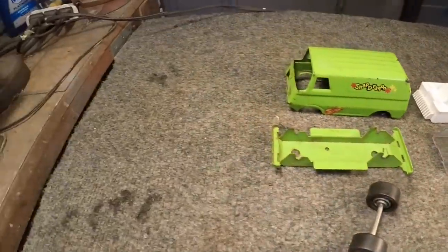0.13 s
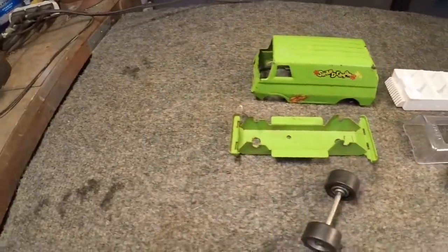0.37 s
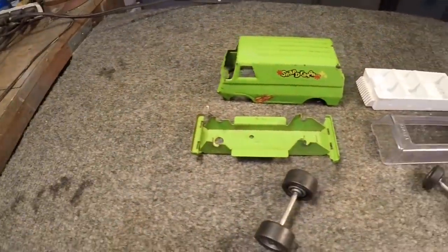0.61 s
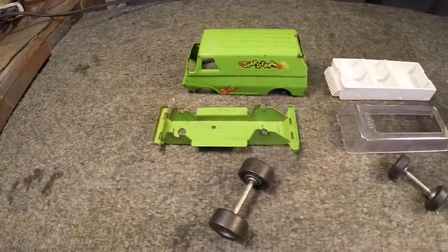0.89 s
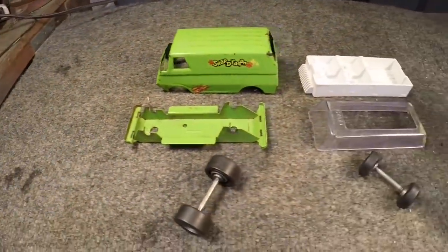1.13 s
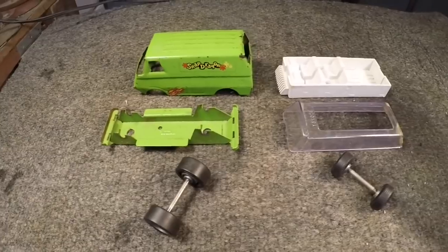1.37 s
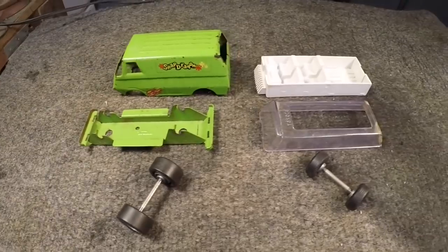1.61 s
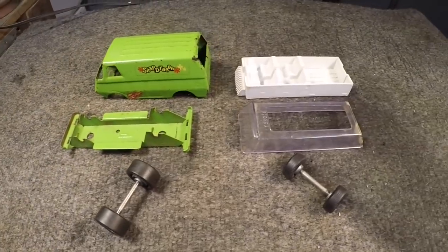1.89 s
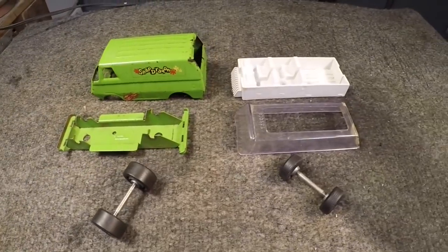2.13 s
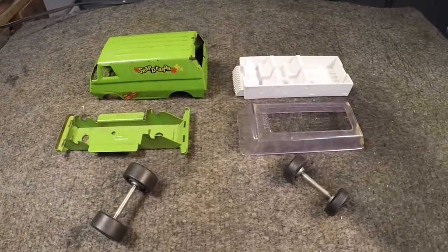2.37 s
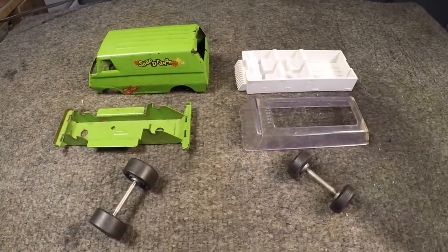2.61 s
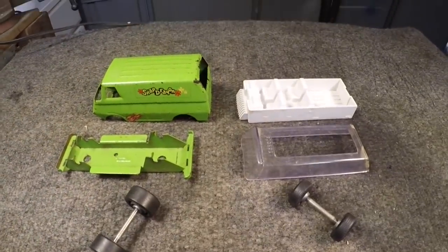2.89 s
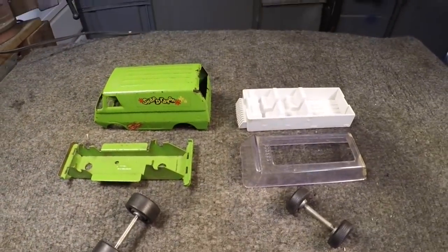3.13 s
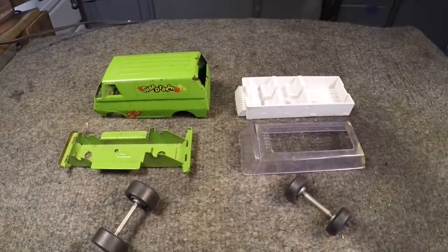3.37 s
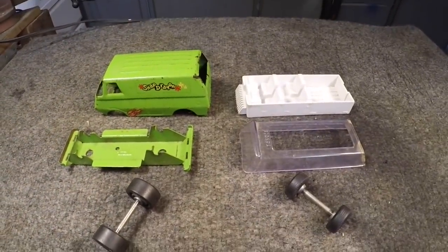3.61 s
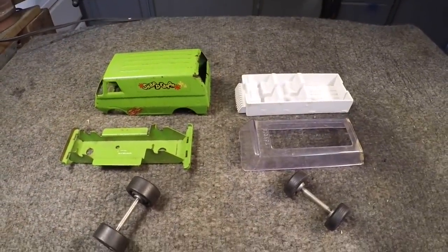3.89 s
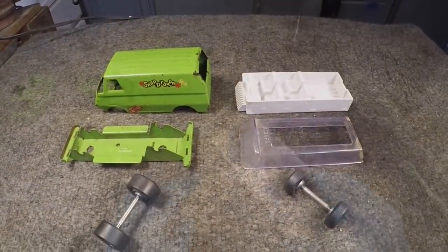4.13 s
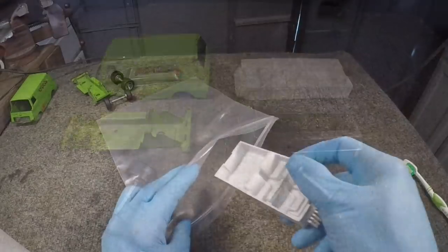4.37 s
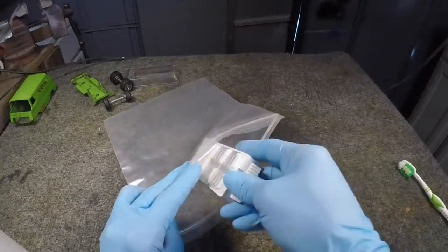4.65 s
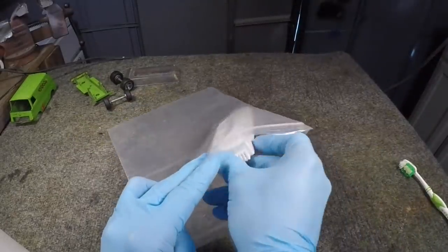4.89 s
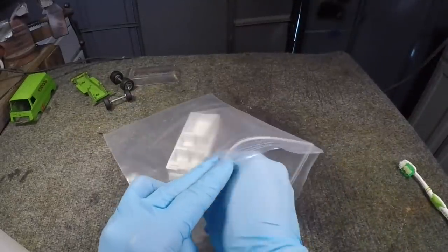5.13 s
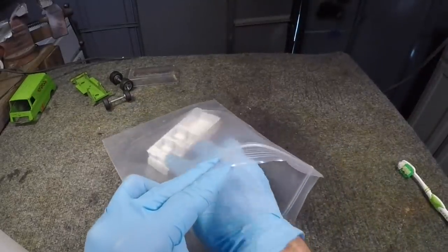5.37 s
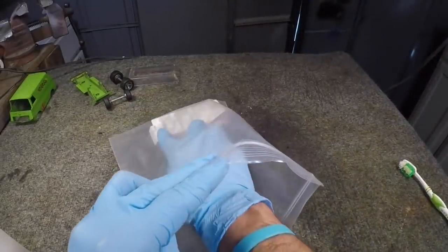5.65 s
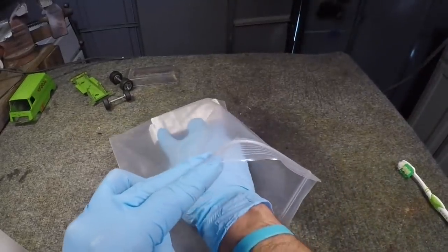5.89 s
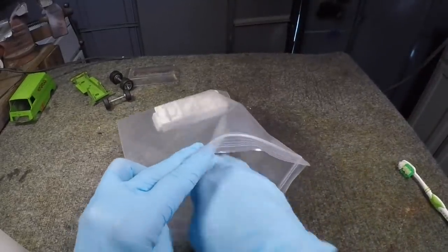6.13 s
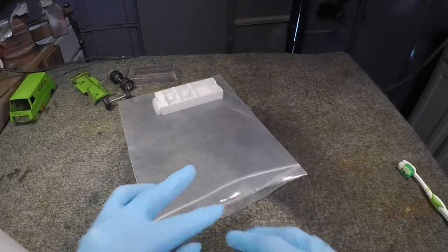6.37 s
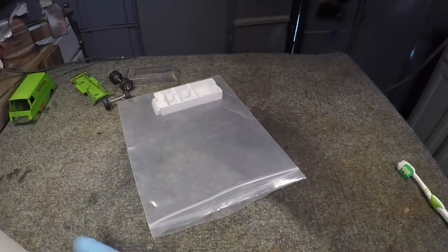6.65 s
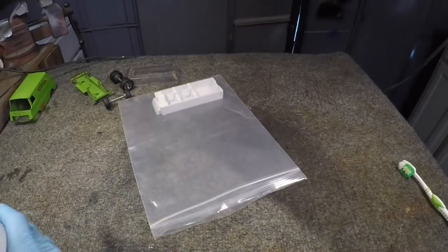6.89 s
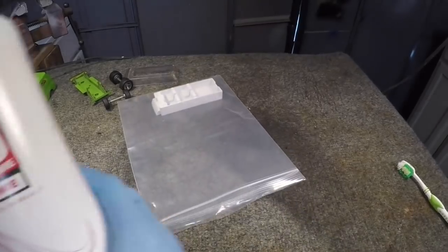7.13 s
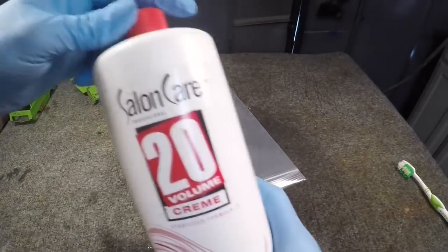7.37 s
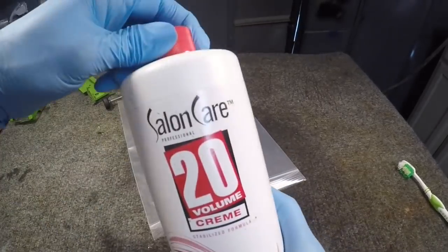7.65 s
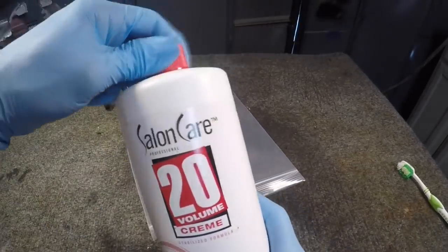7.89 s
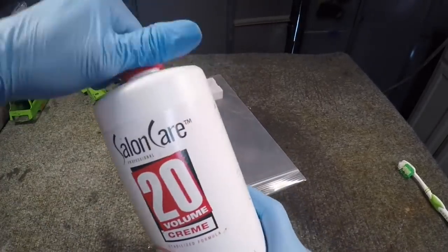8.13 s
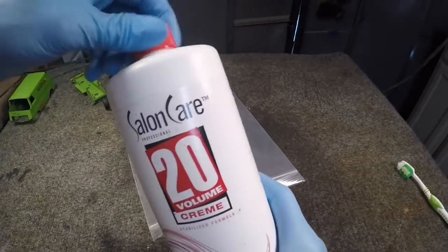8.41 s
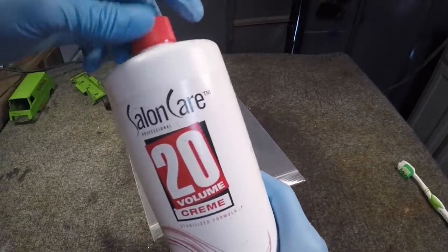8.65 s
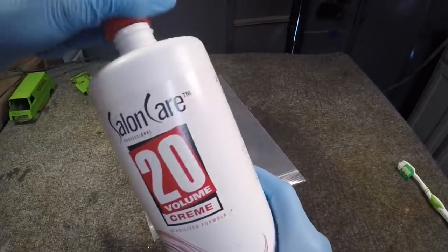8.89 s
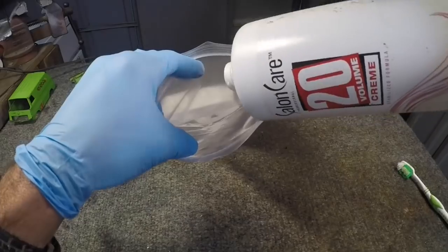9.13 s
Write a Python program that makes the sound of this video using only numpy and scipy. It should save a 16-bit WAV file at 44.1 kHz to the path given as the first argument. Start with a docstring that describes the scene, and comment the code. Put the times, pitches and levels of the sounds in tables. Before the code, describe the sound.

From 0 s a quiet, narrow room noise quickly swells into wide, low roar, with deep irregular air thumps and fluttering buffets at the microphone and weak, wavering fan tones. Buffeting stays strong until about 4.1 s, then sinks; a tiny tick at 4.4 s marks the change. A second background rises from near-mono to stereo by about 5 s: steady low fan hum, its tone swelling and sinking, plus roar and bright airy hiss. Close gloved hands give light, dry plastic taps and film crinkles from 4.9 to 5.6 s, sparse clicks near 5.9 s, then a busy cluster at 6.0-6.25 s. Faint rustles follow. At 7.04 s a bottle is softly knocked; at 7.93-8.1 s come knocks and a short, rough cap scrape with hiss. Duller, hollow knocks come at 8.66 s and 8.86-8.93 s, with a small tick at 9 s, and the fan continues to the end.

```python
"""Bagging a plastic part beside a fan

Two crossfaded scenes in a workshop, heard by a small two-port camera; each opens quiet and mono, then swells to stereo.
First low noise thumps and flutters at the ports, over room roar and fan tones. Then sines hum as the fan, while gloved
hands slide a part into a zip bag, lift a bottle and twist its ribbed cap: struck modes, noise snaps, grainy noise.
"""
import sys
import numpy as np
from scipy import signal
from scipy.fft import rfft, irfft, next_fast_len
from scipy.io import wavfile
from scipy.ndimage import map_coordinates

SR = 44100
rng = np.random.default_rng(int(sys.argv[2]) if len(sys.argv) > 2 else 0)


def materialize(psi):
    """Save the field psi as 16-bit PCM at rate SR to the path in sys.argv[1].

    A 1-D psi becomes a single channel; in a 2-D psi each row is a channel.
    """
    bounded = np.clip(np.atleast_2d(psi).T, -1, 1)
    quanta = np.round(bounded * 32767).astype(np.int16)
    wavfile.write(sys.argv[1], SR, quanta)


def boost_factor(decibels):
    """Convert a level in decibels to a linear amplitude factor."""
    exponent = np.asarray(decibels, float) / 20
    return 10 ** exponent


N = 408807


def seconds():
    """Time of every sample."""
    return np.arange(N) / SR


def unit(x):
    """Scaled to rms 1."""
    return x / np.sqrt(np.mean(x ** 2) + 1e-20)


def along(points, hz):
    """Columns of a (Hz, ..) table read on a log axis."""
    f, *cols = np.transpose(points)
    return [np.interp(np.log(hz + 1), np.log(f + 1), c) for c in cols]


def curves(rows):
    """One value per sample for each column after the time."""
    s, *cols = np.transpose(rows)
    return [np.interp(seconds(), s, c) for c in cols]


def wobble(rate_hz):
    """Smooth random curve, rate_hz knots a second."""
    at = np.arange(0, N + 8, 8)
    knots = rng.standard_normal(int(N * rate_hz / SR) + 4)
    return np.interp(np.arange(N), at, map_coordinates(knots, [at * rate_hz / SR]))


def filtered(x, response):
    """x times a complex response of frequency."""
    m = next_fast_len(x.shape[-1] + 8192)
    return irfft(rfft(x, m) * response(np.fft.rfftfreq(m, 1 / SR)), m)[..., :x.shape[-1]]


def band(x, lo_hz, hi_hz):
    """Causal band-pass."""
    return signal.sosfilt(signal.butter(3, [lo_hz, hi_hz], "bandpass", fs=SR, output="sos"), x)


def rush(spectrum):
    """Two unrelated noises of one colour, scaled together to rms 1."""
    hz = np.fft.rfftfreq(next_fast_len(N), 1 / SR)
    real, imag = rng.standard_normal((2, 2, len(hz)))
    return unit(irfft((real + 1j * imag) * boost_factor(along(spectrum, hz)[0]))[:, :N])


def swell(start_s, tau_s, full_db, depth_db, bend):
    """Level rising by depth_db to full_db; bend below 1 sets off steeply, above 1 eases in."""
    elapsed_s = np.clip(seconds() - start_s, 0, None)
    return full_db - depth_db * np.exp(-(elapsed_s / tau_s) ** bend)


def ports(heard, other, table, open_s, open_tau_s):
    """Left and right: the side signal is partly tied to the mid, partly unrelated, and grows in from open_s."""
    def tied(hz):
        db, in_phase, quarter = along(table, hz)
        link = np.clip(in_phase, -.95, .95) + 1j * np.clip(quarter, -.7, .7)
        unrelated = np.sqrt(np.clip(1 - abs(link) ** 2, 0, 1))
        return boost_factor(db) * np.array([link, unrelated])
    side = filtered(np.array([heard, other]), tied).sum(0)
    side = side * (1 - np.exp(-np.clip(seconds() - open_s, 0, None) / open_tau_s))
    return np.array([heard + side, heard - side])


# Each row: time in seconds, step in amplitude.
TICKS = [(4.42823, .1), (8.99945, -.07)]


def ticks():
    """A step in the waveform relaxes within milliseconds; the first falls at the end of the first scene."""
    out, t = np.zeros(N), np.arange(SR // 40) / SR
    for s, step in TICKS:
        out[round(s * SR):][:len(t)] += step * np.exp(-t / 0.0033)
    return out


# Noise spectra of the room. Each row: frequency in Hz, relative density in dB per Hz.
FIRST_ROAR = [(50, -38), (85, -7), (125, -1), (170, -5), (188, -11), (228, -7.5), (247, -2.5), (260, -9.5),
              (274, -5.5), (287, -10), (300, -5), (345, -5), (365, -8), (400, -4.5), (425, -13.5),
              (541, -13.5), (722, -20), (914, -16.5), (1000, -19), (1520, -23), (2100, -29), (3960, -38),
              (5000, -41), (6400, -36), (7590, -41), (9500, -45.5), (13500, -64), (15100, -79)]
FIRST_TREBLE = [(5000, -60), (6600, -7), (7500, 3), (8300, -6), (9500, -7.5), (11500, -24), (13500, -26),
                (15100, -34)]


def first_room(roar_db, treble_db):
    """Room roar as coloured noise, with a separate treble band."""
    return boost_factor(roar_db) * rush(FIRST_ROAR) + boost_factor(treble_db) * rush(FIRST_TREBLE)


BLADE_HZ = 82.75
# Third fan tone of the first scene. Each row: time in seconds, rms level in dB.
THIRD_TONE_DB = [(0.0, -56.5), (0.67, -46.5), (0.88, -63), (0.92, -51), (1.54, -39.5), (1.68, -68),
                 (1.83, -38.5), (2.28, -42.5), (2.6, -33.5), (2.66, -52), (2.8, -32.5), (3.07, -42.5),
                 (4.36, -46), (4.45, -60)]


def first_fan(roar_db):
    """Three fan hum sines at 2, 2.985 and 3.29 times the blade rate; the first two waver in phase."""
    turn = 2 * np.pi * BLADE_HZ * seconds()
    tones = boost_factor(roar_db - 12.5) * np.sin(3.29 * turn)
    tones += boost_factor(roar_db - 10.0 + 3.7 * wobble(3.85)) * np.sin(2 * turn + wobble(2.47))
    third = boost_factor(curves(THIRD_TONE_DB)[0]) * np.sin(2.985 * turn + .8 * wobble(2.5))
    return tones + np.sqrt(2) * third


# Draught at the ports. Each row: time in seconds, rms level in dB.
THUMP_DB = [(0, -25.5), (.12, -24.5), (.3, -23.5), (.37, -19), (.9, -20), (1.3, -20), (2.0, -17),
            (2.3, -15), (3.5, -15.5), (3.85, -19), (4.07, -12), (4.25, -24), (4.36, -19.5), (4.39, -36)]
# Spectra of thump and flutter. Each row: frequency in Hz, relative density in dB per Hz.
THUMP_SPECTRUM = [(11, -30), (18, -0.5), (32, -1), (52, -4.5), (75, -23), (120, -68), (200, -120)]
FLUTTER_SPECTRUM = [(30, -66), (52, -5.5), (65, -0.5), (100, -7), (135, -14), (160, -21), (205, -26),
                    (270, -38), (460, -120)]


def draught(flutter_db):
    """Eddies buffet the ports: deep noise thumps, and higher noise flutters in uneven bursts."""
    thumps = boost_factor(curves(THUMP_DB)[0]) * rush(THUMP_SPECTRUM)
    gusts_db = 1.1 * wobble(4.93)
    return thumps + boost_factor(flutter_db + gusts_db) * rush(FLUTTER_SPECTRUM)


# Ports in the first scene. Each row: frequency in Hz, side over mid in dB, in-phase link, quarter-cycle link.
FIRST_PORTS = [(28, -7.5, -0.22, 0.11), (52, -4.5, -0.46, 0.1), (96, 0, -0.81, 0.0081),
               (167, -3.5, -0.65, 0.09), (236, -12, 0.42, -0.09), (334, -13.5, 0.62, -0.22),
               (475, -8.5, -0.037, -0.04), (812, -1, -0.15, 0.01), (1555, -0.2, 0.068, 0.23),
               (2774, -1.5, 0.004, 0.05), (4387, -4, -0.06, -0.02), (6070, 1.5, 0.29, 0.02),
               (8500, -9, -0.94, -0.01), (12000, 2, -0.41, 0.0), (13416, -24, 0.0, -0.0)]


def first_scene():
    """Draught over room and fan; roar, treble and flutter sink before the end."""
    sinking_s = np.clip(seconds() - 4.15, 0, 1)
    roar_fall_db, flutter_fall_db = 41 * sinking_s, 30 * sinking_s
    roar_db = swell(start_s=0.63, tau_s=0.52, full_db=-31, depth_db=11, bend=0.5) - roar_fall_db
    treble_db = swell(start_s=0.5, tau_s=3, full_db=-55.5, depth_db=7, bend=1.5) - roar_fall_db
    flutter_db = swell(start_s=0.22, tau_s=0.06, full_db=-24, depth_db=19.5, bend=0.3) - flutter_fall_db
    pair = first_room(roar_db, treble_db) + draught(flutter_db)
    pair[0] += first_fan(roar_db)
    closing = np.clip((TICKS[0][0] - seconds()) / .004, 0, 1)
    return ports(*pair, FIRST_PORTS, open_s=0.1, open_tau_s=0.17) * closing


# Noise spectra of the room. Each row: frequency in Hz, relative density in dB per Hz.
SECOND_ROAR = [(60, -35), (85, 3.5), (103, -9), (150, 1), (200, -6), (225, -3), (245, 7), (262, -2),
               (285, -3), (340, 0.5), (395, -0.5), (445, -14.5), (550, -7), (690, -15.5), (910, -13),
               (1300, -18.5), (2500, -26.5), (4000, -120)]
SECOND_AIR = [(760, -39), (1300, 2.5), (1940, 3), (2400, -7), (2900, 0.5), (3500, -4.5), (4350, -9),
              (5100, -22), (6500, -14.5), (8000, -20), (8900, -18.5), (10500, -28), (13400, -45),
              (15100, -70)]
SECOND_RUMBLE = [(12, -32), (20, -10), (30, 3), (44, -10), (58, 2), (70, -22), (90, -40), (150, -120)]


def second_room(roar_db):
    """Roar, bright air and rumble as noise; air opens quickly, then follows the roar by 0.4 of its dB."""
    air_db = swell(start_s=4.72, tau_s=.16, full_db=-29.6, depth_db=14.5, bend=1.1) + .4 * roar_db
    rumble_db = 0.12 * roar_db - 31.0
    room = boost_factor(roar_db + 2) * rush(SECOND_ROAR)
    return room + boost_factor(air_db) * rush(SECOND_AIR) + boost_factor(rumble_db) * rush(SECOND_RUMBLE)


# Swelling and sinking blade tone. Each row: time in seconds, rms level in dB.
BLADE_DB = [(4.45, -30), (4.48, -45), (4.53, -36), (4.8, -30), (5.0, -37.5), (5.12, -30), (5.29, -32),
            (5.34, -38), (5.44, -31), (6.72, -26.5), (6.79, -27.5), (7.06, -22.5), (7.22, -28),
            (7.39, -20.5), (7.59, -29), (7.87, -31.5), (7.95, -26.5), (8.23, -35), (8.29, -30.5),
            (8.45, -38), (8.71, -26.5), (8.85, -26.5), (8.94, -33.5), (9.05, -23.5), (9.25, -23.5)]
# Other fan tones. Each row: multiple of the blade rate, mean level in dB relative to roar_db.
FAN_TONES = [(.7, -15), (1.4, -17), (1.62, -32), (1.805, -5), (2, -3.5), (3, -8.5), (3.3, -29)]


def fan(roar_db):
    """Blade tone and the tones around it as sines, each wavering a little."""
    turn = 2 * np.pi * BLADE_HZ * seconds()
    hum = boost_factor(curves(BLADE_DB)[0]) * np.sin(turn + 0.19 * wobble(2.3))
    for multiple, db in FAN_TONES:
        waver = boost_factor(1.2 * wobble(4))
        phase = 0.07 * wobble(3.1) + rng.uniform(0, 2 * np.pi)
        hum += boost_factor(roar_db + db) * waver * np.sin(multiple * turn + phase)
    return np.sqrt(2) * hum


# Near sounds through the camera housing. Each row: frequency in Hz, gain in dB.
HOUSING_DB = [(500, -42), (900, -6), (1470, 1), (1950, -5), (2350, -19), (2800, 7), (3200, -16), (3600, 5),
              (5020, -1.5), (5700, -5.5), (6100, -3), (6850, -5), (7990, -5), (8850, -2.5), (10500, -9),
              (12000, -22), (13600, -16), (15100, -25)]
# Film and glove rustles. Each row: start in seconds, length in seconds, level in dB before
# the window, brightness in dB per octave.
RUSTLE_EVENTS = [(4.45, 0.28, -64, 14), (4.75, 0.96, -62, 21), (4.814, .04, -51, 11),
                 (4.953, 0.17, -45, -7.5), (5.1, .135, -44, -11), (5.2, 0.16, -34, -15.5),
                 (5.399, 0.18, -50, -10.5), (5.498, 0.081, -60, -3), (5.98, 0.2, -41, -11),
                 (6.062, 0.064, -40, -16), (6.088, 0.11, -46.5, 4), (6.151, 0.099, -35.5, -22),
                 (6.2, 0.088, -48, -5), (6.33, 0.052, -43.5, -3), (6.577, 0.03, -52, 3),
                 (6.86, 0.047, -51, 6), (7.02, 0.047, -38, -12.5), (7.103, 0.11, -42, -4.5),
                 (8.363, 0.036, -42, 4), (8.82, 0.11, -42, -22)]


def rustles():
    """Film and glove rustle as grainy noise, clumped where single creases give way."""
    out = np.zeros((2, N))
    creases = rush(HOUSING_DB) * boost_factor(2 * wobble(500) + 2.6 * wobble(160))
    grains_per_s, grain_spread_db, grain_tau_s, grain_over_db = 300, 3.5, .002, -4
    kicks = (rng.random(N) < grains_per_s / SR) * boost_factor(grain_spread_db * rng.standard_normal(N))
    grains = signal.lfilter([1], [1, -np.exp(-1 / (SR * grain_tau_s))], kicks)
    creases = creases * (1 + boost_factor(grain_over_db) * unit(grains))
    for s, length_s, db, tilt_db in RUSTLE_EVENTS:
        a, n = round(s * SR), round(length_s * SR)
        piece = filtered(creases[:, a:a + n], lambda hz: boost_factor(tilt_db * np.log2((hz + 100) / 4000)))
        out[:, a:a + n] += boost_factor(db) * unit(piece) * np.hanning(n)
    return out


# Glove on the cap: grips, scrapes, catches, slides on, lets go. Each row: time in seconds,
# scrape level in dB, hiss level in dB.
TWIST_DB = [(7.922, -64.5, -64), (7.931, -32, -36), (7.968, -34.5, -40), (7.982, -42, -41),
            (8.006, -43, -38), (8.06, -52, -43.5), (8.108, -75, -50), (8.16, -90, -62), (8.25, -100, -100)]
# Spectra of scrape and hiss. Each row: frequency in Hz, relative density in dB per Hz.
SCRAPE_SPECTRUM = [(700, -40), (1100, -15), (1700, -4), (1930, -1), (2260, -10), (2840, -1), (3250, -9),
                   (3700, -2), (4100, -10), (4500, -4), (5000, -13), (6000, -7), (7000, -40)]
CAP_HISS_SPECTRUM = [(4000, -36), (5200, -11), (6300, -4), (6950, 1), (7400, -10), (7900, -14), (8250, -12),
                     (8870, -0.5), (9400, -8), (10600, -11), (12000, -25), (13100, -19), (15100, -26)]


def cap_twist():
    """Glove on a ribbed cap: a lower scrape and a longer hiss, both roughened by one random curve."""
    scrape_db, hiss_db = curves(TWIST_DB)
    ribs = boost_factor(2.8 * wobble(500) + 1.5 * wobble(90))
    scrape = boost_factor(scrape_db) * unit(ribs * rush(SCRAPE_SPECTRUM))
    return scrape + boost_factor(hiss_db) * unit(ribs * rush(CAP_HISS_SPECTRUM))


def contact(modes, knock_db, snap_db, crinkle_db, t60_s, dull):
    """A crack, a short ring, a snap of noise above it and a film crinkle, in two draws; dB before decay."""
    t = np.arange(SR // 20) / SR
    noise = rng.standard_normal((4, 2, len(t)))
    film = filtered(noise[2], lambda f: boost_factor(along(HOUSING_DB, f)[0]))
    tone = 0
    for hz, db in modes:
        tone = tone + boost_factor(db + 2.95 * rng.standard_normal()) * np.sin(2 * np.pi * hz * t)
    ring = np.sqrt(1 - dull) * unit(tone) + np.sqrt(dull) * unit(band(noise[0], 750, 2300))
    rise_s = 0.00015 + 0.00097 * (1 - dull) ** 2  # the purer the ring, the slower it builds up
    tap = boost_factor(knock_db) * ring * (1 - np.exp(-t / rise_s))
    tap += boost_factor(snap_db) * unit(band(noise[1], 2370, 4140)) * (1 - np.exp(-t / 0.00061))
    tap += boost_factor(crinkle_db) * unit(band(film, 5700, 18000)) * (1 - np.exp(-t / 0.00038))
    crack_decay_db = -60 * t / 0.0056
    crack = boost_factor(snap_db - 9 + crack_decay_db) * unit(band(noise[3], 1000, 5600))
    thud = dull ** 2 * unit(band(noise[3, ::-1], 950, 3330))  # fuller in dull contacts
    crack += boost_factor(knock_db + crack_decay_db) * thud
    return tap * boost_factor(-60 * t / t60_s) + crack


def placed(hits):
    """Sum of (time in seconds, contact) pairs."""
    out = np.zeros((2, N + SR))
    for s, hit in hits:
        out[:, round(s * SR):][:, :hit.shape[1]] += hit
    return out[:, :N]


# Knocks on bottle and cap. Each row: time in seconds, knock in dB, ring in Hz, snap over the knock in dB.
BOTTLE_KNOCKS = [(7.037, -28, 2780, -19), (7.0385, -32, 1160, -22), (7.9335, -27, 2810, -12),
                 (7.947, -39, 3480, 1), (7.964, -36, 2000, -7), (8.658, -30, 1890, -20),
                 (8.6785, -26, 774, -21), (8.862, -32, 1000, -15), (8.876, -28, 1250, -20),
                 (8.899, -25, 790, -24), (8.912, -31, 1000, -16), (8.921, -36, 1230, -20),
                 (8.9304, -21.5, 1260, -27)]


def bottle_knocks():
    """Each knock rings one mode, with less noise than the part."""
    return placed([(s, contact([(hz, 0)], db, db + snap, db + snap - 3, t60_s=0.029, dull=0.17))
                   for s, db, hz, snap in BOTTLE_KNOCKS])


# Modes of the plastic part. Each row: frequency in Hz, relative level in dB.
PART_MODES = [(950, 1), (1300, 4), (1680, -16), (1940, 7)]
PART_DULL = 0.45  # noise share of the knock, in power
# Film creases popping. Each row: time in seconds, crinkle level in dB.
FILM_POPS = [(4.684, -47.5), (4.996, -37.5), (5.448, -38), (6.0886, -43), (6.109, -32.5), (6.147, -29.5)]


def film_pops():
    """A crease pops: mostly crinkle, with the part's modes knocked faintly."""
    return placed([(s, contact(PART_MODES, db - 10, db - 15, db, t60_s=0.029, dull=PART_DULL))
                   for s, db in FILM_POPS])


# Taps of the part in the bag. Each row: time in seconds, knock in dB, snap over the knock in dB,
# pitch favoured by the struck spot in Hz.
PART_TAPS = [(4.915, -41, -8, 950), (4.967, -34, -4, 1100), (4.9856, -36, -13, 1300), (4.996, -38, 3, 1400),
             (5.037, -30.5, -5, 1500), (5.0464, -38, 1, 1300), (5.068, -47, 11.5, 1900),
             (5.1354, -35, -3, 1700), (5.343, -28, -16, 1940), (5.449, -26.5, -2, 1500),
             (5.457, -37, -4, 1900), (5.484, -39, -10, 1300), (5.517, -38, -5, 1300),
             (5.527, -31.5, -8, 1300), (5.6248, -37.5, 0, 1400), (5.876, -26, -21, 1500),
             (5.9618, -36, -12, 1400), (6.014, -34, -6, 1200), (6.0653, -26, -12, 1400),
             (6.0722, -33, -12, 1800), (6.089, -31, -8, 1900), (6.0955, -34, -6, 1700),
             (6.1747, -35, -15, 1800), (6.178, -31, -16, 1000), (6.1944, -29, -16, 1100),
             (6.201, -31, -6, 1200), (6.2075, -32.5, -16, 1300), (6.2397, -43, 5, 1900)]


def part_taps():
    """The struck spot favours a pitch: modes lose 17 dB per octave away from it."""
    hits = []
    for s, db, snap, spot_hz in PART_TAPS:
        modes = [(hz, mode_db - 17 * abs(np.log2(hz / spot_hz))) for hz, mode_db in PART_MODES]
        hits.append((s, contact(modes, db, db + snap, db + snap - 17, t60_s=0.034, dull=PART_DULL)))
    return placed(hits)


# Ports for the far room and the near hands. Each row: frequency in Hz, side over mid in dB,
# in-phase link, quarter-cycle link.
FAR_PORTS = [(31, -15, -0.75, -0.33), (70, -14, -0.83, -0.32), (122, 1, -1.05, -0.3),
             (171, -8, -0.28, -0.1), (228, -10.5, -0.099, -0.2), (322, -18, 0.39, -0.5),
             (529, -8.5, -0.17, -0.16), (775, 0, -0.27, -0.07), (918, 4, -0.21, 0.38),
             (1084, -4, -0.28, 0.02), (1469, -7, -0.34, -0.1), (2034, -3.5, -0.69, 0.03),
             (2837, -4, -0.36, 0.53), (3950, -10.5, -0.83, -0.18), (5430, 9, 0.64, -0.03),
             (8000, -18, -0.22, -0.15), (12247, 7, 0.11, -0.02)]
NEAR_PORTS = [(1000, -10, -0.84, 0), (2000, -1, -0.86, .2), (3000, -5, -0.56, .5), (4500, -6, -0.3, 0),
              (6500, 0, 0.7, 0), (9000, -8, -0.53, 0), (13000, -1, 0.22, 0)]


def second_scene():
    """Fan, room and handling, faded in under the end of the first scene."""
    roar_db = swell(start_s=4.6, tau_s=.9, full_db=-32.3, depth_db=12.7, bend=1.7)
    background = second_room(roar_db) + fan(roar_db) * [[1], [.5]]
    hands = rustles() + cap_twist() + bottle_knocks() + film_pops() + part_taps()
    far = ports(*background, FAR_PORTS, open_s=4.665, open_tau_s=0.14)
    near = ports(*hands, NEAR_PORTS, open_s=4.665, open_tau_s=0.14)
    return (far + near) * np.clip((seconds() - 4.17) / 0.31, 0, 1)


def scene():
    """Both scenes and the ticks."""
    return first_scene() + second_scene() + ticks()


# Preamplifier hiss. Each row: frequency in Hz, relative density in dB per Hz.
HISS_SPECTRUM = [(1500, -38), (3400, -8), (5500, -1), (6700, -13.5), (8900, -3), (10500, -5), (13000, -9.5),
                 (15100, -17)]


def preamplifier(dry):
    """Rounds off the largest thumps, hisses alike into both channels and rolls off the top."""
    rounded = dry / (1 + abs(dry / .8) ** 3) ** (1 / 3)
    hiss = boost_factor(-64.0) * rush(HISS_SPECTRUM)[0]
    return filtered(rounded + hiss, lambda hz: 1 / np.sqrt(1 + (hz / 14500) ** 30))


def roll_off(x):
    """The treble ends steeply here."""
    return signal.sosfilt(signal.butter(12, 15240, fs=SR, output="sos"), x)


def record(dry):
    """The finished mix, through the preamplifier."""
    heard = preamplifier(dry)
    return roll_off(heard)


dry = scene()
out = record(dry)
materialize(out)
```